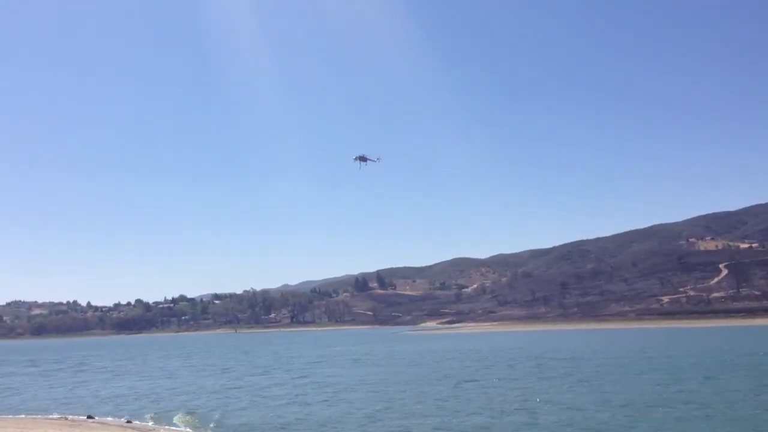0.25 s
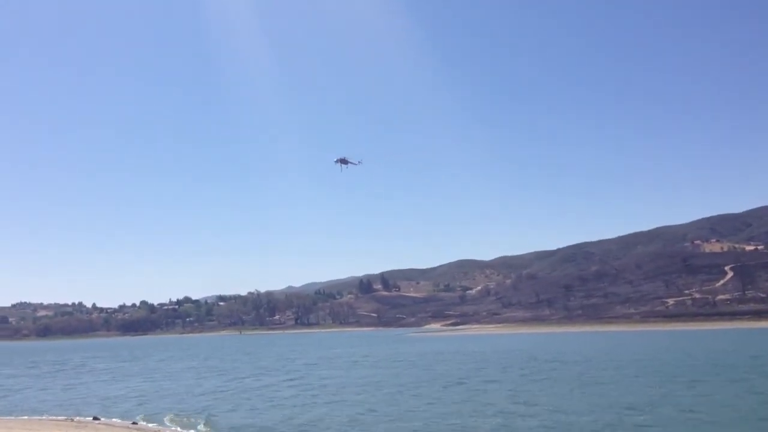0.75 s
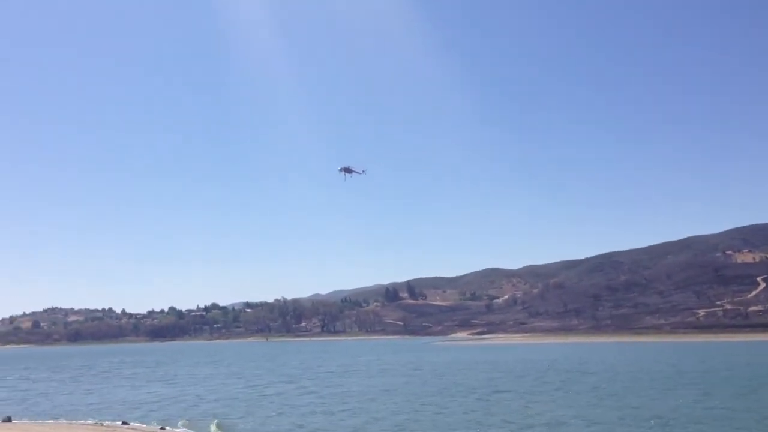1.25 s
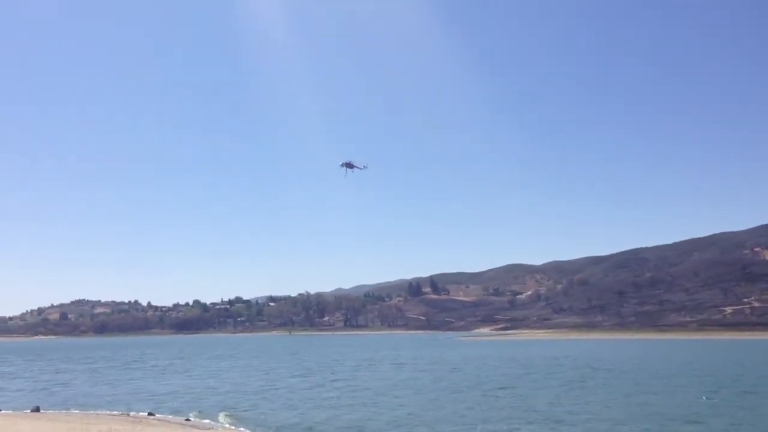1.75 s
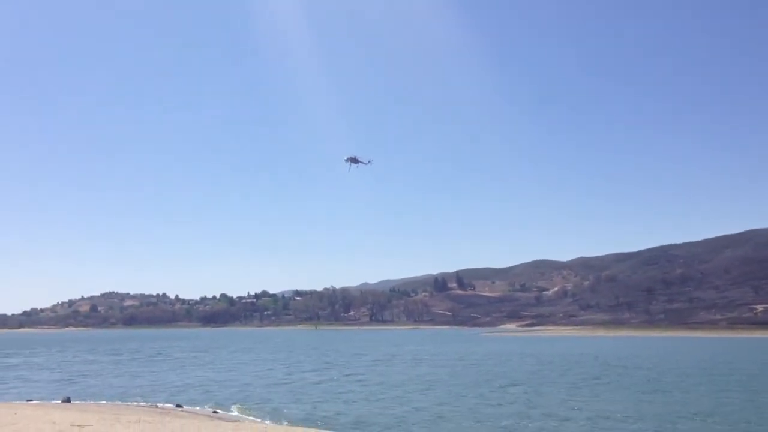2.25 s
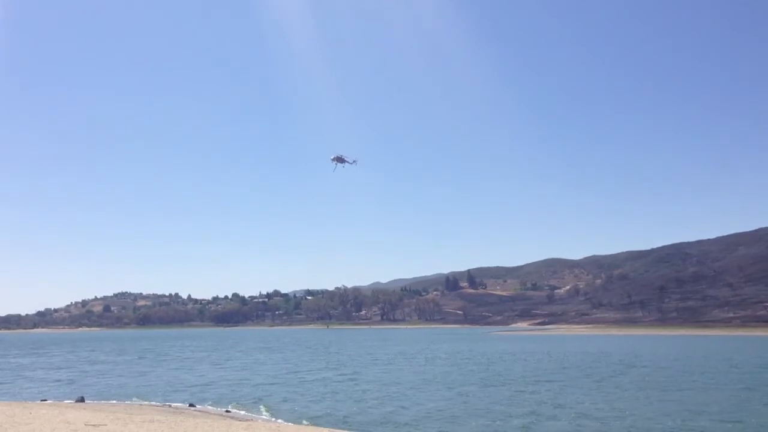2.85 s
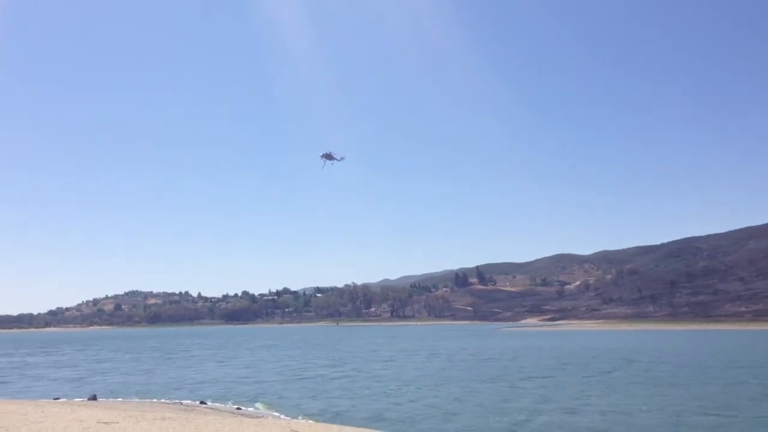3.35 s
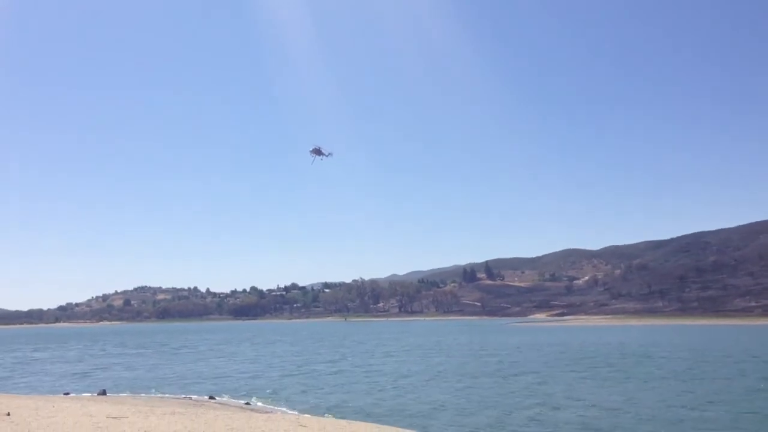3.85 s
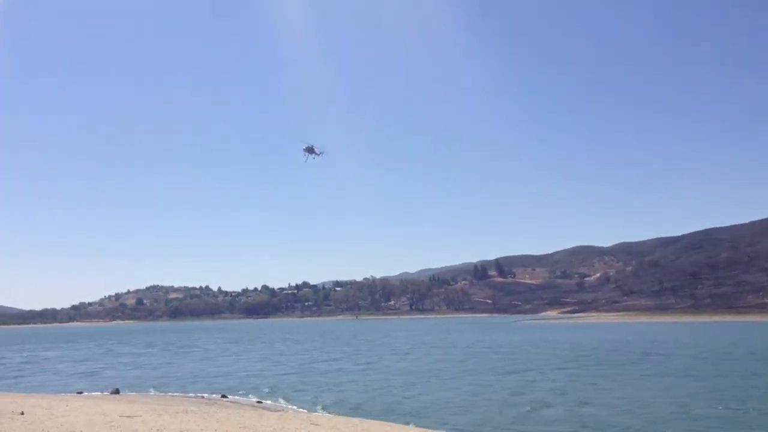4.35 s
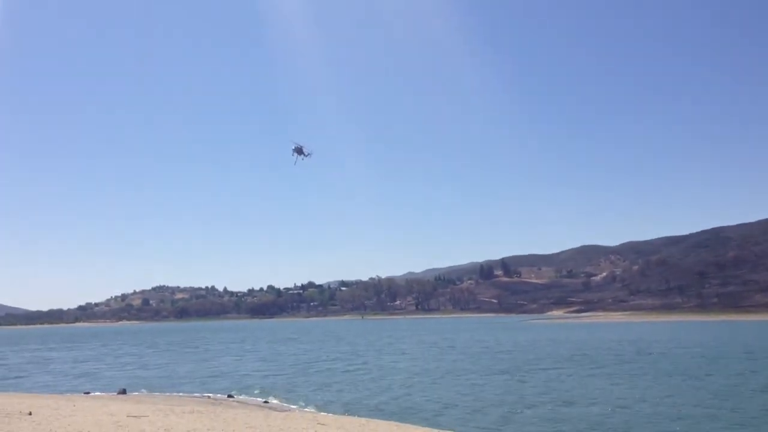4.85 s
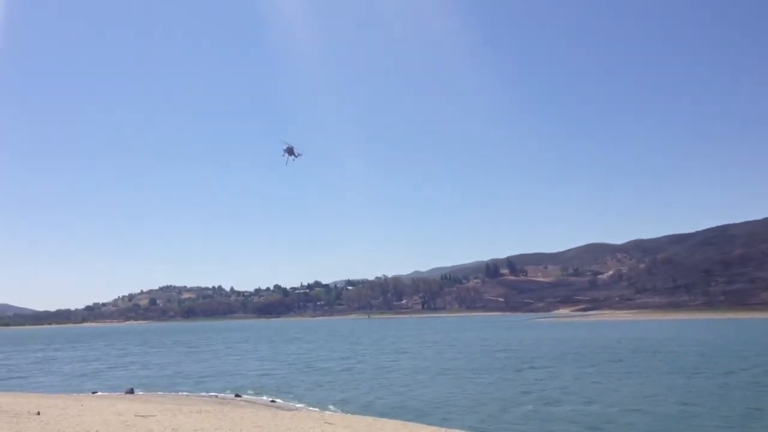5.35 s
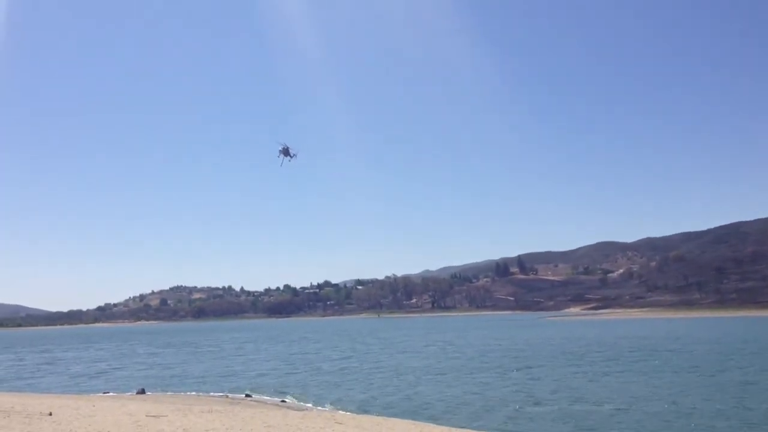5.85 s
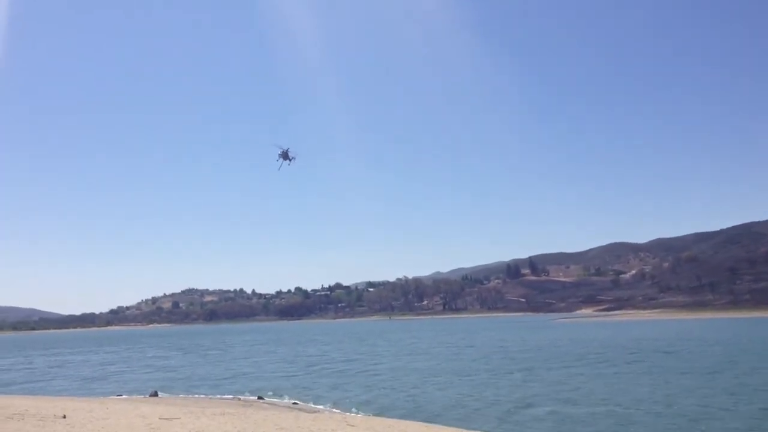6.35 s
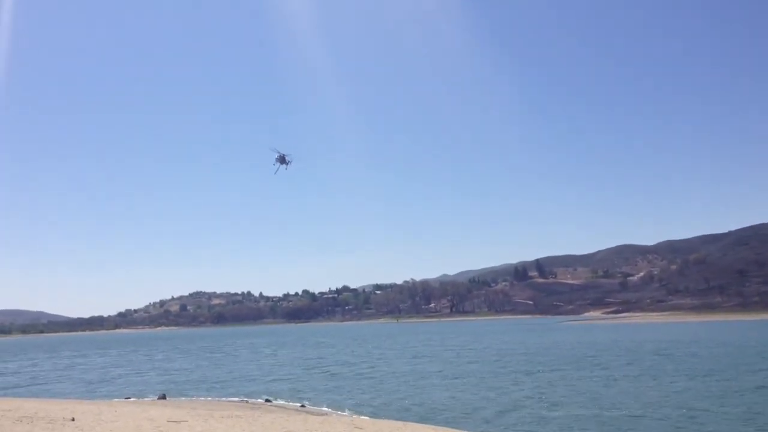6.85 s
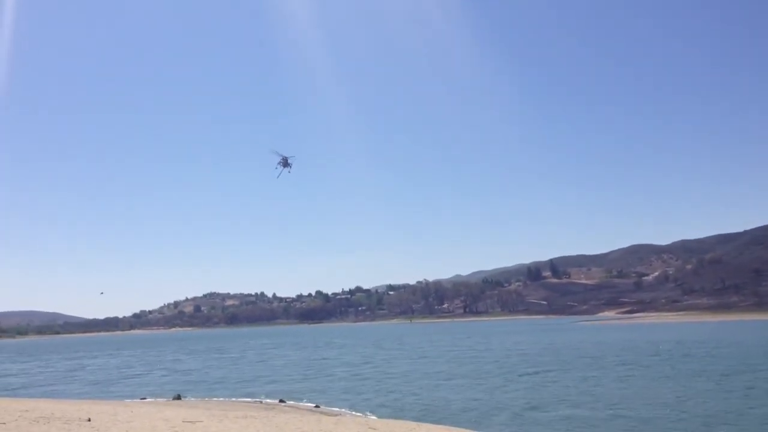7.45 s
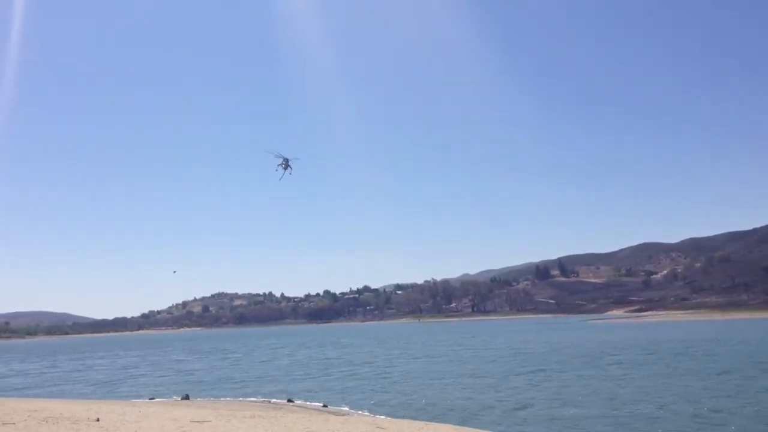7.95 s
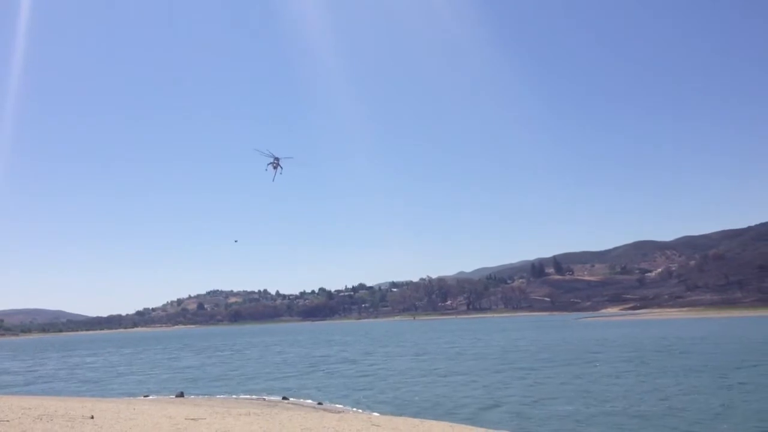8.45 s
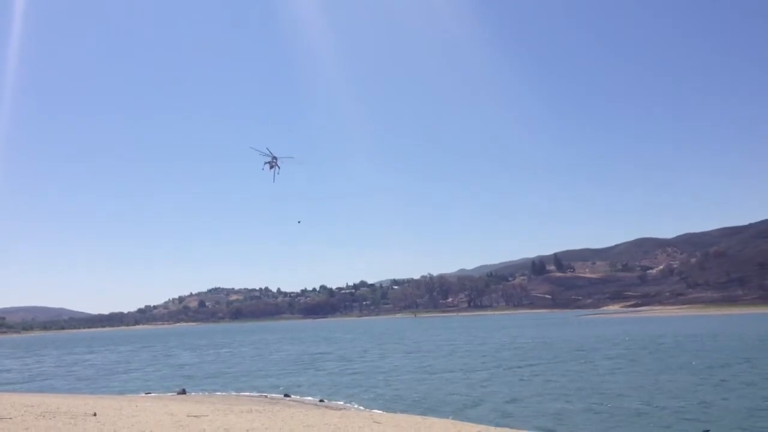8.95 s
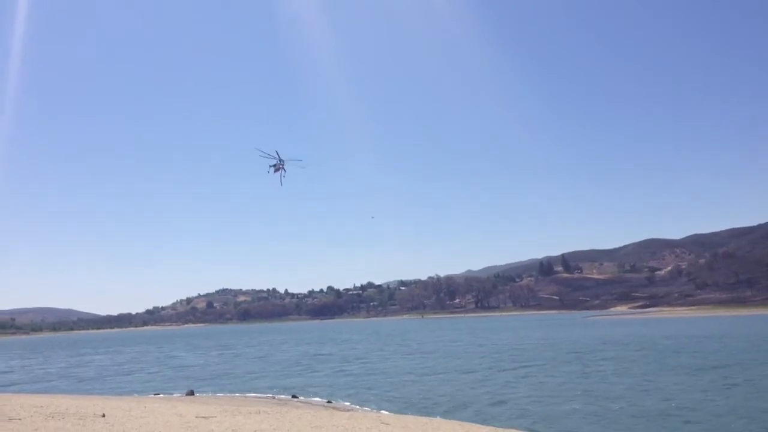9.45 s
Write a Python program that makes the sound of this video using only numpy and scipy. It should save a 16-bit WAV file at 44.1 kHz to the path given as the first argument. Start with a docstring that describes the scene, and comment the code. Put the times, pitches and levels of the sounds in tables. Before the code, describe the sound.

A helicopter with whining turbines and a chopping roar draws slowly nearer, while gusts of wind rumble and thump on the microphone.

```python
"""A heavy twin-turbine helicopter turns in over a lake towards a phone held on a windy beach.
Two compressors whine a little apart over the jet roar, which the tail rotor chops; gear tones come
and go. Wind rumbles and its eddies thump the microphone port. For two seconds the phone listens
through its sheltered port: no wind, a brighter, louder helicopter and more hiss."""
import sys
import numpy as np
from scipy import signal
from scipy.fft import irfft, next_fast_len
from scipy.io import wavfile
from scipy.ndimage import uniform_filter1d

SR = 44100
rng = np.random.default_rng(int(sys.argv[2]) if len(sys.argv) > 2 else 0)


def unload_audio(sound):
    """Save the sound as a 16-bit wav file, at the path given as the first command line argument."""
    columns = np.transpose(np.atleast_2d(sound))
    # keep every value between -1 and 1, then stretch to whole-number steps
    steps = np.round(np.clip(columns, -1, 1) * 32767)
    wavfile.write(sys.argv[1], SR, steps.astype(np.int16))


N = 428652
T = np.arange(N) / SR
FFT_SIZE = next_fast_len(N)
HZ = np.maximum(np.fft.rfftfreq(FFT_SIZE, 1 / SR), 1)


def undb(db):
    return np.exp(np.asarray(db) * np.log(10) / 20)


def bell(t_s, width_ms):
    """Gaussian, width_ms wide at half height."""
    return np.exp(-.5 * (t_s / width_ms * 2355) ** 2)


def curves(table):
    """Per-sample curves from rows of (time [s], values)."""
    time_s, *columns = np.transpose(table)
    return [np.interp(T, time_s, column) for column in columns]


def colour(points):
    """Spectral gain from (frequency [Hz], level [dB]) points; -120 dB outside them."""
    hz, db = np.transpose(points)
    return undb(np.interp(np.log(HZ), np.log(hz), db, left=-120, right=-120))


def noise(gain, ref=1):
    """Noise of spectral gain `gain`; rms 1 when gain equals ref."""
    re, im = rng.standard_normal((2, len(HZ)))
    spectrum = (re + 1j * im) * gain * np.sqrt(FFT_SIZE / 2)
    return irfft(spectrum, FFT_SIZE)[..., :N] / np.sqrt(np.mean(ref ** 2))


def walk(rate_hz):
    """Random steps, smoothed twice; spread near 1."""
    hold = int(SR / rate_hz)
    steps = np.repeat(rng.standard_normal(N // hold + 1), hold)
    return 1.79 * uniform_filter1d(uniform_filter1d(steps, hold), hold)[:N]


def scatter(smear_hz):
    """Complex fading, rms 1, whose bandwidth follows smear_hz."""
    place = np.cumsum(smear_hz) / SR * 16
    steps = np.arange(int(place[-1]) + 2)
    slow = rng.standard_normal((2, len(steps)))
    for _ in range(4):
        slow = uniform_filter1d(slow, size=12)
    fading = np.interp(place, steps, slow[0] + 1j * slow[1])
    return fading / np.sqrt(np.mean(np.abs(fading) ** 2))


# (frequency [Hz], relative density [dB])
HISS_SPECTRUM = [(6500, -17), (8500, 0), (12000, -1.5), (14500, 0.5), (15300, -4)]

def hiss(sheltered):
    """Faint hiss, louder at the sheltered port; flares briefly at the end."""
    gain = colour(HISS_SPECTRUM)
    flare_db = 13 * bell(T - 9.65, width_ms=25)
    return noise(gain, gain) * undb(-73.5 + 11.5 * sheltered + flare_db + .89 * walk(1.1))


# (pitch ratio, level [dB], width ratio)
EDDY_PARTS = [(0.501, -8, 1.3), (.8, -1, 0.52), (1.25, 0.5, 0.68), (2.101, -9, 0.26)]
SNAP_MS = 6  # shorter eddies crack as one clean swing and leave less wake

def add_eddy(out, time_s, peak_db, hz, width_ms, draws):
    """One eddy: four bell-shaped pressure swings, low and long to high and short."""
    ratio, part_db, width_ratio = np.transpose(EDDY_PARTS)[:, :, None]
    sigma_s = width_ms / 2355
    reach = int(6 * sigma_s * SR)
    k = np.arange(-reach, reach)
    delay_s = .5 * sigma_s * (draws[:4, None] - .5)
    phase_cycles = min(width_ms / SNAP_MS, 1) ** 2 * (draws[4:, None] - .5)
    envelope = bell(k / SR - delay_s, width_ms * width_ratio)
    swings = np.cos(2 * np.pi * (hz * ratio * k / SR + phase_cycles)) * envelope
    swings -= envelope * swings.sum(1, keepdims=True) / envelope.sum(1, keepdims=True)  # no DC
    pulse = (undb(part_db) * swings).sum(0)
    out[np.clip(int(time_s * SR) + k, 0, N - 1)] += undb(peak_db) * pulse / np.abs(pulse).max()


# (frequency [Hz], relative density [dB])
RUMBLE_SPECTRUM = [(15, -32.5), (45, -2.5), (75, -27), (130, -2.5), (250, 3), (450, -7.5), (700, -13),
                   (1100, -20), (2000, -46.5)]
# rumble and patter: (time [s], gain [dB])
WIND_GAIN = [(0.0, -27), (0.4, -26.5), (0.7, -25), (1.15, -23), (1.6, -25), (2.1, -25), (2.83, -25.5),
             (4.8, -26.5), (5.15, -21.5), (5.45, -22.5), (5.9, -24), (6.25, -28.5), (6.6, -33), (7.2, -26),
             (7.9, -24.5), (8.45, -31), (8.8, -25.5), (9.72, -24)]
# loudest eddies: (time [s], peak [dB], width [ms])
THUMPS = [(0.255, -10, 9.2), (0.274, -13.5, 9.7), (0.326, -13, 5.1), (0.378, -12.5, 10.3),
          (0.436, -10.5, 5.5), (0.46, -7.5, 10.8), (0.545, -15.5, 10.5), (0.609, -16.5, 14),
          (0.667, -12.5, 4.3), (0.745, -15, 13.5), (0.774, -4.5, 2.4), (0.866, -13.5, 4.1),
          (0.889, -13.5, 6), (0.912, -8, 8.1), (0.988, -9.5, 3.3), (1.022, -13.5, 6.6), (1.058, -17, 6.5),
          (1.08, -6.5, 5.7), (1.182, -14.5, 7.3), (1.211, -10.5, 4.2), (1.219, -5.5, 5.5), (1.294, -14, 12),
          (1.308, -10, 16.4), (1.357, -11.5, 5.8), (1.394, -13.5, 4.9), (1.426, -10, 9.7),
          (1.518, -15.5, 11), (1.585, -13.5, 6.0), (1.763, -12.5, 10.5), (1.821, -6.5, 8.9),
          (1.871, -12.5, 6.5), (1.959, -13, 7.1), (2.02, -16, 14), (2.179, -17.5, 6.5), (2.289, -7, 6.7),
          (2.356, -14.5, 6.1), (2.523, -15, 10), (2.635, -13, 8.2), (2.655, -11, 7.2), (2.801, -12, 8.3),
          (4.807, -13, 7.8), (4.824, -10, 10), (4.869, -9, 10.7), (4.899, -12.5, 9.9), (4.933, -9.5, 16),
          (5.006, -10, 9.1), (5.046, -11, 9.1), (5.073, -7.5, 11), (5.128, -9.5, 11), (5.159, -3.5, 5.2),
          (5.2, -2.5, 7.8), (5.23, -7.5, 5.4), (5.29, -11, 7.8), (5.337, -9, 11), (5.389, -9, 7.9),
          (5.451, -8.5, 5.5), (5.574, -13, 3.7), (5.599, -1.5, 3.4), (5.66, -13.5, 6.6), (5.763, -9, 9.1),
          (5.835, -6, 4.4), (5.878, -10.5, 5.9), (5.92, -13.5, 3.5), (5.942, -11.5, 5), (6.052, -8.5, 5.1),
          (6.062, -11, 6.6), (6.198, -11.5, 5.4), (6.906, -11.5, 26), (6.986, -9, 7), (7.06, -7.5, 7.4),
          (7.221, -13.5, 5.2), (7.299, -12.5, 7.6), (7.4, -18, 18), (7.626, -10.5, 16), (7.683, -12, 6.7),
          (7.707, -3.5, 5), (7.781, -4.5, 4.8), (7.832, -11, 4.3), (7.841, -7.5, 8), (7.992, -3, 4.9),
          (8.022, -15, 13.5), (8.177, -11, 9.1), (8.227, -16.5, 10), (8.272, -10.5, 15), (8.286, -8.5, 7.3),
          (8.3, -14, 5.2), (8.381, -8, 3.5), (8.528, -13, 12), (8.574, -17, 7.4), (8.663, -8.5, 24),
          (8.799, -11, 13.6), (8.838, -10.5, 11.5), (8.921, -12, 6.7), (8.973, -11.5, 5.2), (9.038, -13, 5),
          (9.069, -18, 8), (9.16, -14, 5.5), (9.234, -11, 10), (9.379, -8.5, 4.8), (9.468, -15, 14),
          (9.517, -14.5, 8.2)]

def wind():
    """Wind on the open port: gusty rumble, flurries of small eddies, thumps with rumbling wakes."""
    gain = colour(RUMBLE_SPECTRUM)
    flurry_db = .79 * np.tanh(walk(22))
    rumble = noise(gain, gain) * undb(5.7 * np.tanh(walk(45)) + flurry_db - 5.5)
    patter, thumps, wake_envelope = np.zeros((3, N))
    for k, u in enumerate(rng.random((550, 12))):
        add_eddy(patter, time_s=(k + 3 * u[0]) / 552 * N / SR, peak_db=4 + 8 * u[1] ** 2,
                 hz=230 * 2 ** (1.08 * u[2]), width_ms=3 + 6 * u[3] ** 2, draws=u[4:])
    for (time_s, peak_db, width_ms), u in zip(THUMPS, rng.random((len(THUMPS), 9))):
        hz = 860 / width_ms ** .399 * 2 ** (.38 * (u[8] - .5))  # short eddies snap higher
        add_eddy(thumps, time_s, peak_db, hz, width_ms, u[:8])
        wake_gain = undb(peak_db - 16) * min(width_ms / SNAP_MS, 1) ** 2
        wake_envelope += wake_gain * bell(T - time_s - .0076, width_ms=26.6)
    wakes = wake_envelope * noise(gain, gain) * undb(4.6 * np.tanh(walk(90)))
    return (rumble + patter * undb(flurry_db)) * undb(curves(WIND_GAIN)[0]) + thumps + wakes


# (start [s], end [s], frequency [Hz], level [dB])
GEAR_TONES = [(1.694, 2.8, 1455, -49), (4.292, 5.447, 2042, -45.5), (5.84, 6.75, 1448, -44),
              (7.35, 8.005, 1483, -45.5), (8.054, 8.95, 1594, -44)]

def gearbox():
    """Meshing gears: unsteady tones that come and go with the helicopter's angle."""
    out = np.zeros(N)
    fading = .3 + .95 * scatter(smear_hz=np.full(N, 70.))
    for start_s, end_s, hz, db in GEAR_TONES:
        a, b = int(start_s * SR), min(int(end_s * SR), N)
        tone = np.real(fading[a:b] * np.exp(2j * np.pi * hz * T[a:b]))
        out[a:b] += np.sqrt(2) * undb(db) * signal.windows.tukey(b - a, .5) * tone
    return out


ROAR_TOP_HZ = 5210  # sharp upper edge of the roar

def top_treble(level_db):
    """Thin treble hiss above the whine; swells faintly near 2.8 s, strongest in the last two seconds."""
    gain = colour([(ROAR_TOP_HZ, 0), (6200, -8), (7800, -22)])
    return noise(gain, gain) * undb(level_db + 2 * np.tanh(walk(17)))


# (time [s], blade rate [Hz])
TAIL_ROTOR_RATE = [(4.8, 62.8), (5.9, 60.6)]

def tail_rotor(chop):
    """Blade phase and a gain that puffs once per blade."""
    phase = 2 * np.pi * np.cumsum(curves(TAIL_ROTOR_RATE)[0]) / SR
    puffs = 1.74 * np.exp(-3 * (1 - np.cos(phase))) * undb(3.2 * np.tanh(walk(40)))
    return phase, 1 + chop * (puffs - .7)


# roar at each port: (frequency [Hz], relative density [dB])
OPEN_SPECTRUM = [(20, -19), (150, -6), (500, -6.5), (1000, -3), (1300, -10), (1480, -4.5), (1800, -16.5),
                 (2030, -10.5), (2750, -21), (3000, -17.5), (3400, -17), (3800, -20), (4700, -24),
                 (5600, -20.5)]
SHELTERED_SPECTRUM = [(20, -20), (150, 4), (280, 2.5), (420, -0.5), (800, -2), (1250, 1), (1500, -3.5),
                      (1900, -1), (2300, -8.5), (2700, -11), (3400, -13.5), (3700, -16), (4500, -10.5),
                      (5600, -21)]
# (time [s], gain [dB], upper-band boost [dB])
ROAR_GAIN = [(0.0, -42, -5.5), (1.3, -43.5, -3), (2.3, -39, -9), (2.8, -42, -6), (3.0, -38.5, -3.5),
             (3.35, -41.5, -6.5), (3.75, -36.5, 4.5), (4.05, -41, -4), (4.35, -39, -4), (4.6, -38, 0),
             (4.8, -39, 0.5), (5.1, -35, -8), (5.66, -41.5, 0.5), (6.4, -34.5, -7.5), (6.9, -41, -3.5),
             (7.65, -35, 0), (8.4, -35.5, -1.5), (9.0, -41.5, 2.5), (9.72, -38, -2)]

def jet_roar(chop, sheltered, upper_hz=2500):
    """Jet and blade noise in bands that swell separately; the tail rotor drones and chops the mids."""
    roar_db, upper_db = curves(ROAR_GAIN)
    upper_db -= 1.5 * sheltered
    roar_lowpass = 1 / np.sqrt(1 + (HZ / ROAR_TOP_HZ) ** 240)
    ports = np.array([colour(OPEN_SPECTRUM), colour(SHELTERED_SPECTRUM)]) * roar_lowpass
    mids = ports * (HZ > 1000) * (HZ < 2500)
    ports /= np.sqrt(np.mean(mids ** 2, axis=1, keepdims=True))
    blade_phase, blade_gain = tail_rotor(chop)
    edges_hz = 20 * 2 ** np.r_[0, 3, 4, np.arange(5, 8.6, .5)]
    roar = 0
    for low_hz, high_hz in zip(edges_hz[:-1], edges_hz[1:]):
        opened, covered = noise(ports * (HZ >= low_hz) * (HZ < high_hz))
        band = opened + sheltered * (covered - opened)
        upper_share = np.clip(.5 + np.log2(low_hz / upper_hz), 0, 1)
        swell = undb(.8 * walk(3) + 1.1 * walk(15) + upper_share * upper_db)
        roar += band * swell * (blade_gain if 300 < low_hz < 2400 else 1)
    drone = sum(undb(3 * walk(5)) * np.cos(k * blade_phase + k * k) for k in range(3, 7))
    return (roar + undb(-15.5) * drone) * undb(roar_db + 8 * sheltered)


def intake_ring(stages_db):
    """Breathy ring among the tones of the later compressor stages."""
    gain = colour([(2850, -10), (3150, 1.5), (3600, -8.5)])
    return noise(gain, gain) * undb(-57.5 + stages_db + 2 * walk(8))


# per engine: (time [s], level [dB], width [ms])
FOCUS_SURGES = [
    [(3.52, -47.5, 78), (3.72, -40.5, 75), (3.86, -46, 33), (4.5, -45, 83), (4.63, -51, 80),
     (4.79, -46.5, 50), (5.38, -34, 46), (5.53, -38, 64), (5.69, -42.5, 74), (6.4, -41.5, 36),
     (6.5, -40.5, 48), (6.72, -47, 120), (6.93, -46, 110), (7.14, -48.5, 140), (7.32, -43, 200),
     (7.53, -55, 120), (7.81, -46, 83), (8.1, -56, 120), (8.28, -49.5, 130), (8.47, -53, 90),
     (8.72, -55, 220)],
    [(3.63, -61, 61), (4.86, -44.5, 69), (4.97, -49, 60), (7.6, -49, 70), (7.96, -52, 86)],
]

def air_focus(engine, smear_hz):
    """Complex gain of the surges in which the air focuses the whine; more smear, more flutter."""
    envelope = sum(undb(db) * bell(T - time_s, ms) for time_s, db, ms in FOCUS_SURGES[engine])
    roughness = np.minimum(smear_hz / 70, 1)
    flutter_db = 3.5 * roughness * walk(60)
    waver_rad = .9 * roughness * walk(50)
    return envelope * undb(flutter_db) * np.exp(1j * waver_rad)


# first-stage blade tone: (time [s], engine one [Hz], engine two [Hz])
BLADE_TONES = [(0.0, 4830, 4770), (1.22, 5030, 4965), (1.82, 5144, 5001), (2.43, 5188, 5003),
               (3.04, 5168, 4999), (3.65, 5118, 4971), (4.25, 5039, 4926), (4.86, 4997, 4890),
               (5.47, 4998, 4890), (6.68, 5054, 4923), (7.29, 5089, 4949), (7.9, 5101, 4981),
               (8.51, 5133, 5032), (9.72, 5295, 5199)]
# first stage, open port: (time [s], engine one [dB], engine two [dB])
WHINE_LEVELS = [(0.0, -55, -64), (.5, -58.5, -57), (1.2, -56, -58.5), (1.6, -61, -57.5), (2.1, -66, -56.5),
                (2.9, -52, -58), (3.4, -61.5, -56), (3.75, -50, -51), (4.05, -54.5, -58.5), (4.4, -54, -53),
                (4.7, -60, -62), (4.85, -49, -52), (5.2, -54.5, -54.5), (5.7, -50, -59), (6.15, -51.5, -56),
                (6.6, -50.5, -60), (7.04, -56.5, -58), (7.3, -48, -54), (7.6, -55, -48), (8.0, -55.5, -58),
                (8.5, -54, -56), (9.0, -63.5, -55), (9.72, -55, -52.5)]
# turbulent smear, less on a shorter path: (time [s], engine one [Hz], engine two [Hz])
TONE_SMEAR = [(0, 120, 130), (4.3, 100, 120), (5.3, 60, 95), (6.8, 45, 80), (7.4, 26, 70), (9.72, 55, 80)]
# on the same shafts: (ratio to first stage, engine one [dB], engine two [dB])
LATER_STAGES = [(2 / 3, -58, -65), (7 / 12, -57, -61)]

def compressor_whine(stages_db, sheltered):
    """Blade tones of both engines: a direct ray, rays scattered by moving air, and focused surges."""
    out = 0
    engines = zip(curves(BLADE_TONES), curves(WHINE_LEVELS), curves(TONE_SMEAR))
    for engine, (hz, db, smear_hz) in enumerate(engines):
        phase = 2 * np.pi * np.cumsum(hz) / SR
        direct_share = np.clip(15 / smear_hz, 0, .9)
        fading = np.sqrt(direct_share) + np.sqrt(1 - direct_share) * scatter(smear_hz)
        rays = air_focus(engine, smear_hz) + undb(db + 2 * np.tanh(walk(20))) * fading
        out += np.sqrt(2) * undb(16 * sheltered) * np.real(rays * np.exp(1j * phase))
        ragged = fading + .5 * scatter(2 * smear_hz)
        envelope = (.4 + np.sqrt(2) * np.abs(ragged)) / 1.4
        for ratio, *base_db in LATER_STAGES:
            tone = np.cos(ratio * phase + np.angle(ragged))
            out += undb(base_db[engine] + stages_db) * envelope * tone
    return out


# (time [s], later-stage gain [dB], top treble [dB], tail rotor chop [0-1])
TIMBRE = [(0, -20.5, -87.5, 0.12), (2.8, -18.5, -68, 0.16), (4.8, -5, -104.5, 0.1), (5.9, -2.5, -96, 0.1),
          (6.5, -9, -90, 0.45), (7.3, -11, -91, 0.16), (7.7, 8.5, -60, 0.2), (8.6, 8.5, -61, 0),
          (9.1, 3, -62.5, 0.57), (9.72, 4.5, -62, 0.14)]
SHELTER_START_S, SHELTER_END_S = 2.838, 4.797

def scene():
    """Mono mix of the nearing helicopter, wind and hiss; the sheltered port shuts out the wind."""
    stages_db, treble_db, chop = curves(TIMBRE)
    sheltered = 1. * (T > SHELTER_START_S) * (T < SHELTER_END_S)
    sheltered = uniform_filter1d(uniform_filter1d(sheltered, size=400), size=400)
    floor = hiss(sheltered)
    helicopter = jet_roar(chop, sheltered) + compressor_whine(stages_db, sheltered)
    helicopter += intake_ring(stages_db) + gearbox() + top_treble(treble_db)
    return (floor + (1 - sheltered) * wind() + helicopter)[None]


def record(dry, bass_hz=110, top_hz=15330, ceiling=1.8):
    """Phone: steep bass cut with a small leak, soft clipping of the hardest thumps, top cut."""
    highpass = signal.butter(3, bass_hz, "high", fs=SR, output="sos")
    lowpass = signal.ellip(10, .2, 80, top_hz, fs=SR, output="sos")
    thinned = signal.sosfilt(highpass, dry) + undb(-27.5) * dry
    return signal.sosfilt(lowpass, ceiling * np.tanh(thinned / ceiling))


dry = scene()
out = record(dry)
unload_audio(out)
```